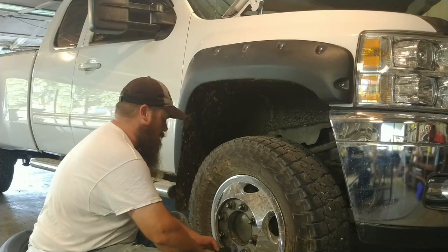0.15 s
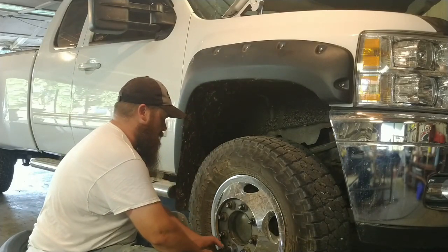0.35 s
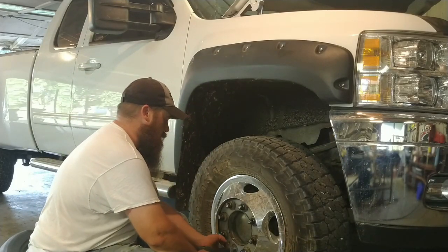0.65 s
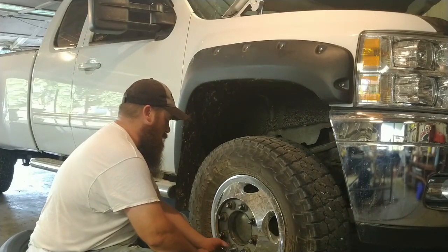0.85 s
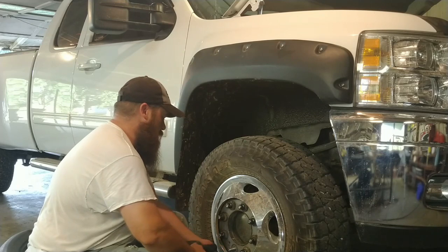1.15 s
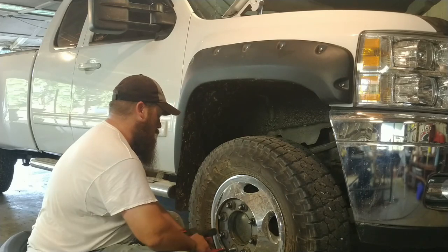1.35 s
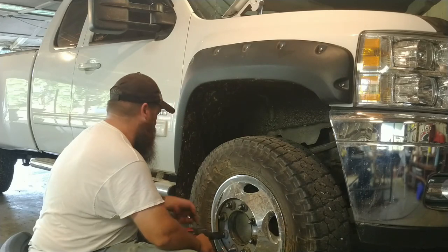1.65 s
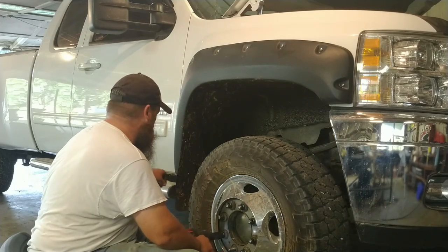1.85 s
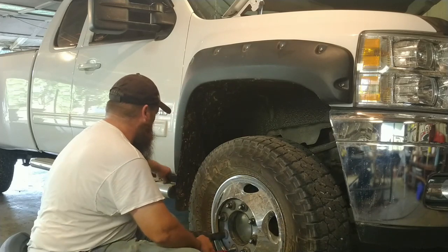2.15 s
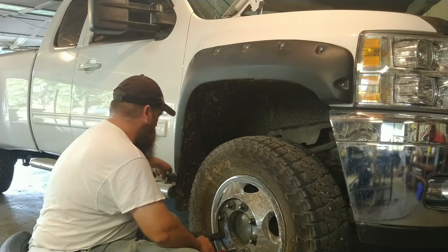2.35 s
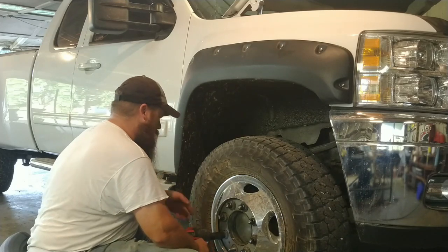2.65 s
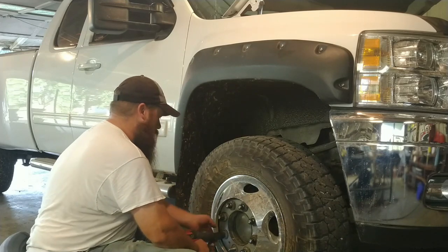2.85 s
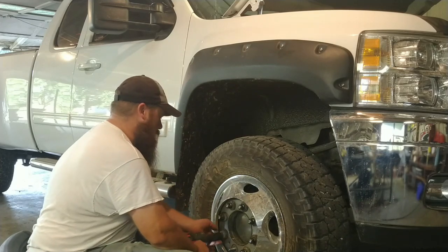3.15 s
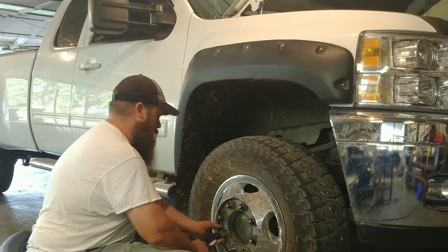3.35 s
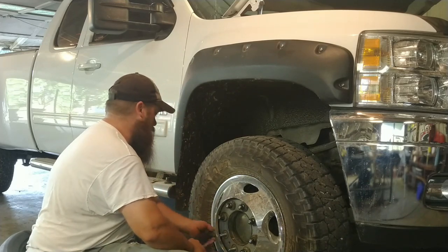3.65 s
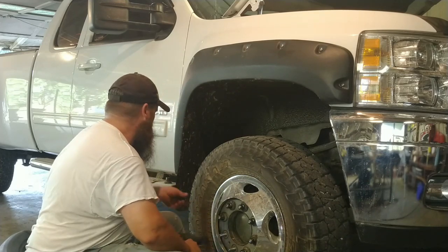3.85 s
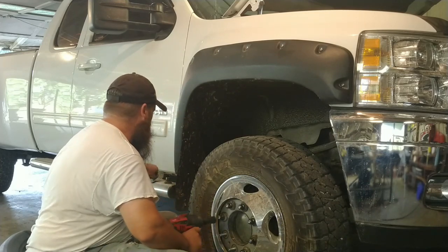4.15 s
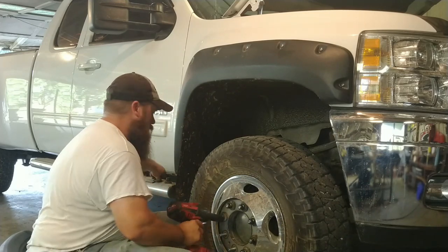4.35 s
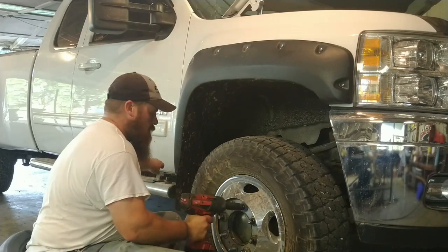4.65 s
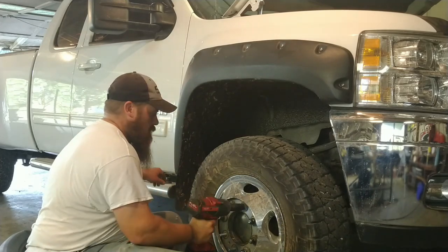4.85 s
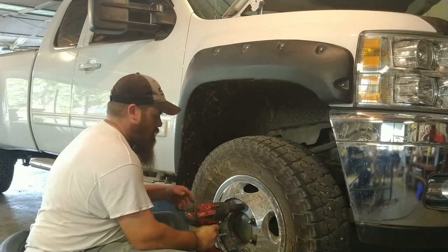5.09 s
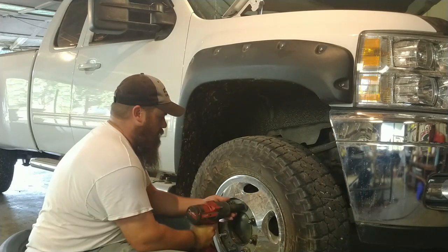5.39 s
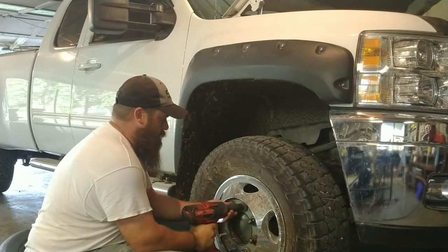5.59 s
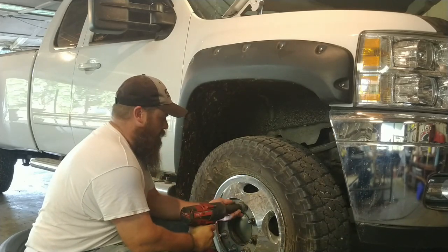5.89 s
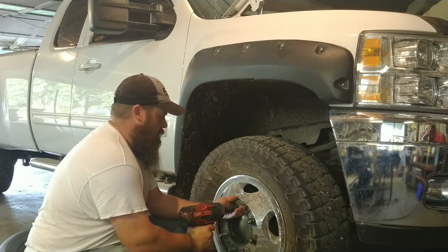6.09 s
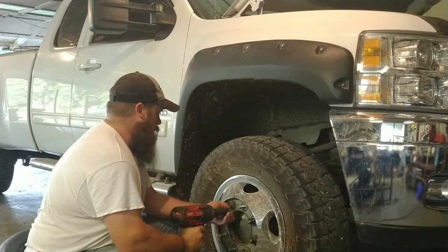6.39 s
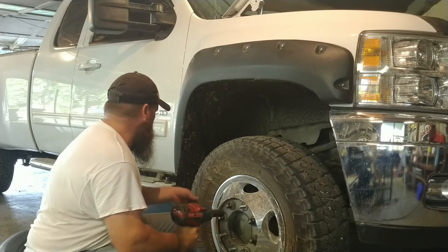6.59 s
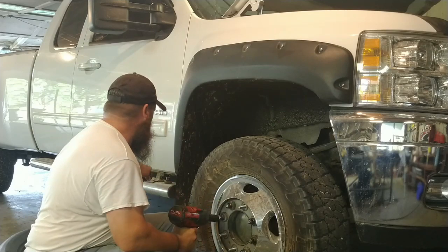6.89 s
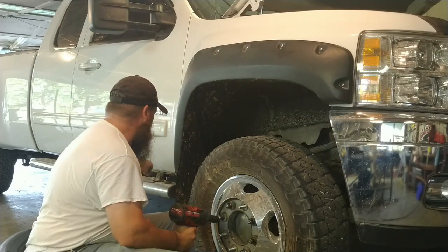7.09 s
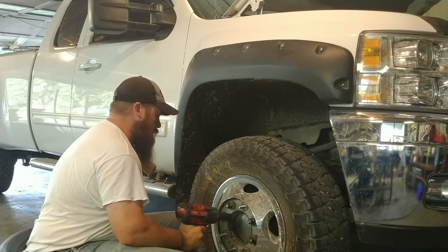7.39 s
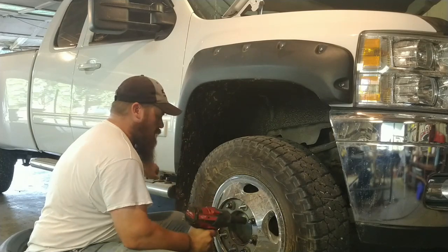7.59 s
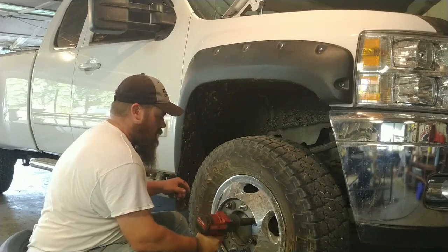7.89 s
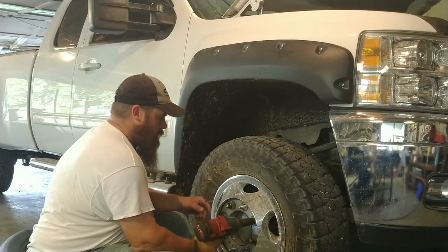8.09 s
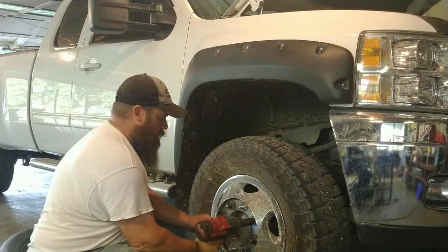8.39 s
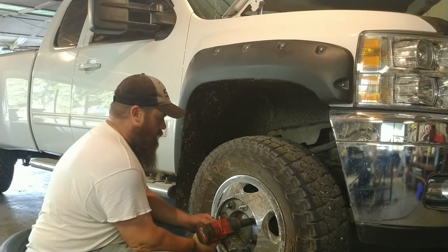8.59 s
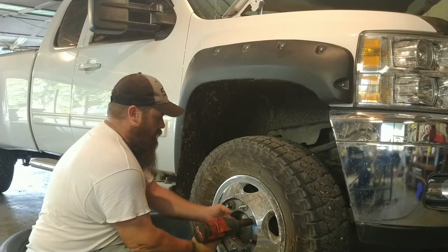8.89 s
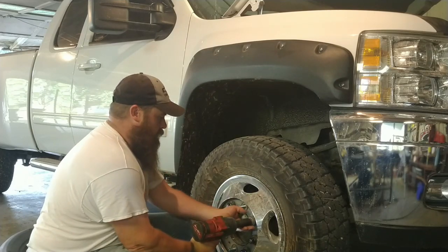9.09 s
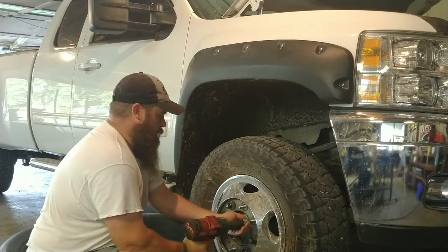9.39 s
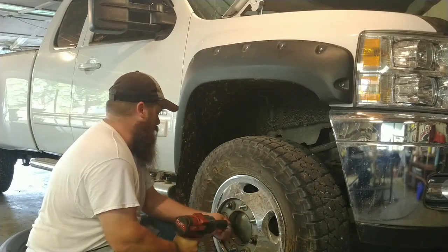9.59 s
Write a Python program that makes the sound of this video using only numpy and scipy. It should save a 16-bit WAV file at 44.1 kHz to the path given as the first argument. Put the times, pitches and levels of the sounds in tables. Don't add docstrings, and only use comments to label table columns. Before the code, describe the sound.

A cordless impact wrench works on a wheel in a hard, echoing workshop, heard close in wide stereo. An already running spin brakes at the very start, followed by short rattling blips and clicks around 0.3, 0.7 and 1.0 seconds. Soft taps follow, then a cluster of heavy socket clanks at 2.1-2.4. At 2.7 the first long pull begins: about thirty blows a second in a harsh growl until 3.0, then a whirring rising whine, braking squeal and stop at 3.8. Clanks sound at 4.6, with bright ringing bounces around 5.0. The second pull runs 5.4-6.4, ending with a small nut rattle. Quiet handling and a knock at 7.4 lead to several sharp clanks at 7.9-8.1. The third pull hammers from 8.6 to 8.9, whines loudly, and brakes near 9.5, ending in a short rattle. Faint shop air and low hum persist underneath.

```python
import sys
import numpy as np
from scipy import signal
from scipy.fft import rfft, irfft
from scipy.io import wavfile
from scipy.ndimage import uniform_filter1d

SR = 44100
rng = np.random.default_rng(int(sys.argv[2]) if len(sys.argv) > 2 else 0)


def inscribe(sig):
    pcm = np.round(np.clip(np.atleast_2d(sig).T, -1, 1) * 32767)
    wavfile.write(sys.argv[1], SR, pcm.astype(np.int16))


def convert_level_to_amplitude(level_db):
    exponent = np.asarray(level_db, float) / 20
    return 10 ** exponent


N = 429534
T = np.arange(N) / SR

# start [t/s], end [t/s], blow rate [f/Hz]
HAMMER_RUNS = [
    (2.749, 3.013, 30.9),
    (5.407, 5.671, 30.1),
    (8.589, 8.889, 32),
]
# onset [t/s], level [level/dB], hardness [0 dull to 2 bright],
# thud [level/dB], steel ring [level/dB]
SOCKET_CLANKS = [(0.301, -25.5, 1.01, -41.5, -41), (0.685, -27, 1.05, -62, -34),
                 (1.07, -27.5, 0.33, -69.5, -57), (2.098, -45, -0.47, -54, -72),
                 (2.136, -16, 0.53, -27.5, -66), (2.344, -24, 0.61, -26, -39.5),
                 (2.365, -17.5, -0.057, -46, -37.5), (4.352, -61.5, 0.55, -90.5, -90),
                 (4.555, -65, 1.04, -45.5, -89.5), (4.577, -25, -0.2, -35, -50),
                 (4.586, -24, 0.29, -46, -29), (7.109, -58.5, 1.55, -75.5, -34.5),
                 (7.14, -61, 1.1, -76, -39), (2.41, -25.5, 0.095, -35, -60),
                 (7.384, -30.5, 0.09, -38.5, -28.5), (7.915, -38.5, -0.22, -50, -75),
                 (7.937, -46, -0.37, -68, -58), (7.963, -31.5, 1.01, -55, -46),
                 (7.995, -28.5, 0.6, -44, -73), (8.103, -30, -0.075, -36, -70)]
NUT_CLANKS = [
    (0.952, -37, 0, -54, -61.5),
    (1.648, -57, 1.24, -65.5, -59.5),
    (1.83, -32, 0.43, -51, -63),
    (3.8, -32.5, 1.28, -79.5, -31.5),
    (4.961, -21.5, 0.59, -79, -30.5),
    (5.03, -25.5, 0.7, -63, -30),
    (5.069, -24.5, 0.52, -39, -42),
    (6.439, -37, 1.205, -55.5, -41.5),
    (6.754, -65, 1.7, -78, -57),
    (6.826, -67.5, 0.53, -63, -77),
]
# start [t/s], trigger release [t/s], stop [t/s],
# top pole pitch [f/Hz], level [level/dB]
MOTOR_SPINS = [
    (-.5, -.04, 0.1, 4575, -47.5),
    (.705, .91, 0.99, 3854, -45.5),
    (3.06, 3.543, 3.793, 4593, -50),
    (5.69, 6.197, 6.43, 4632, -52),
    (8.93, 9.475, 9.57, 4620, -42),
]
BLIP_S = .3


def band(x, lo_hz, hi_hz, order=2):
    sos = signal.butter(order, [lo_hz, min(hi_hz, .45 * SR)], "bandpass", fs=SR, output="sos")
    return signal.sosfilt(sos, x) * np.sqrt(SR / 2 / (hi_hz - lo_hz))


def mode(x, hz, t60):
    radius = np.exp(-np.log(1000) / (t60 * SR))
    angle = 2 * np.pi * hz / SR
    return signal.lfilter([np.sin(angle)], [1, -2 * radius * np.cos(angle), radius * radius], x)


def rough_tone(hz, width_hz):
    sos = signal.butter(2, width_hz / 2, fs=SR, output="sos")
    slow = signal.sosfilt(sos, rng.standard_normal((2, N)))
    turn = 2 * np.pi * np.cumsum(hz) / SR
    return (slow[0] * np.cos(turn) + slow[1] * np.sin(turn)) / slow.std()


def holds(rows, edge_s):
    out = np.zeros(N)
    for row in rows:
        start, end = row[0], row[0] + row[1]
        out[int(start * SR):int(end * SR)] = convert_level_to_amplitude(row[-1])
    return uniform_filter1d(out, int(edge_s * SR))


def play(curves, column, fade_s=0.013):
    rows = np.vstack(curves)
    gate = sum((T >= c[0][0]) & (T < c[-1][0]) for c in curves)
    return np.interp(T, rows[:, 0], rows[:, column]), uniform_filter1d(1. * gate, int(fade_s * SR))


def dull(x):
    return signal.sosfilt(signal.butter(8, 12400, fs=SR, output="sos"), x)


def air():
    # frequency [f/Hz], density [level/dB]
    spectrum = [(30, -13.5), (60, -7.5), (130, 8.5), (250, -4.5), (500, -2), (900, -10), (2000, -15.5),
                (5000, -28), (10000, -30.5), (16000, -23.5)]
    log_hz, db = np.log(np.array(spectrum)[:, 0]), np.array(spectrum)[:, 1]
    hz = np.maximum(np.arange(N // 2 + 1) * SR / N, 1)
    x = irfft(rfft(rng.standard_normal((2, N))) * convert_level_to_amplitude(np.interp(np.log(hz), log_hz, db)), N)
    return convert_level_to_amplitude(-66.5) * x / x.std()


def hum():
    # frequency [f/Hz], level [level/dB]
    partials = [
        (70.4, -80),
        (141, -80),
        (210.5, -81.5),
        (281, -86),
        (491, -86),
    ]
    return sum(convert_level_to_amplitude(db) * np.sin(2 * np.pi * hz * T) for hz, db in partials) * np.array([[1], [-.3]])


def pops():
    # onset [t/s], level [level/dB]
    thumps = [
        (.953, -38),
        (3.806, -46),
        (.04, -42),
    ]
    taps = np.zeros(N)
    for s, db in thumps:
        taps[int(s * SR):int((s + .002) * SR)] = convert_level_to_amplitude(db)
    return band(taps, 25, 540, order=1) * np.array([[1], [.5]]) / 3


def room(x, direct_db, bend):
    changes = [0, .097, .955, 1.6, 2.09, 2.66, 3.8, 4.5, 4.95, 5.35, 6.44, 7.1, 7.37, 7.9, 8.51, 9.59]
    # low edge [f/Hz], high edge [f/Hz], time to fall 60 dB [t/s],
    # share that differs between the ports [ratio]
    decay = [
        (86, 462, 0.47, 0.72),
        (424.4, 1136, 0.27, 0.6),
        (1640, 3950, 0.36, 0.9),
        (5750, 31000, 0.35, 1.07),
    ]
    t = np.arange(int(.6 * SR)) / SR
    edges = [int(s * SR) for s in changes] + [N]
    sides = np.array([[1], [-1]])
    parts = []
    for a, b in zip(edges, edges[1:]):
        noise = rng.standard_normal((2, len(t))) * np.minimum(t / 0.003, 1)
        tail = 0
        for lo_hz, hi_hz, t60, apart in decay:
            x_band = band(noise[0] + apart * noise[1] * sides, lo_hz, hi_hz)
            weight = np.sqrt((hi_hz - lo_hz) / t60 / (1 + apart ** 2))
            tail = tail + x_band * weight * convert_level_to_amplitude(-60 * (t / t60) ** bend)
        tail /= np.sqrt(np.sum(tail ** 2, axis=1, keepdims=True))
        early = rng.standard_normal((2, 900)) * np.exp(-np.arange(900) / 260)
        tail[:, :900] += convert_level_to_amplitude(-3.5) * early / np.sqrt(np.sum(early ** 2, axis=1, keepdims=True))
        tail[:, 0] += convert_level_to_amplitude(direct_db)
        parts.append(signal.fftconvolve(x[None, a:b], tail, axes=1)[:, :b - a])
    return np.hstack(parts)


def flutter(x):
    flutter_hz, share = 70, .6
    hz = np.arange(N // 2 + 1) * SR / N
    loop = share / (1 + (hz / 600) ** 2)
    comb = np.sqrt(1 - loop ** 2) / (1 - loop * np.exp(-2j * np.pi * hz / flutter_hz))
    return irfft(rfft(x) * comb, N)


def knocks():
    # onset [t/s], centre [f/Hz], level [level/dB], rise [t/s]
    soft = [(1.272, 211, -68, 0.031), (1.688, 187, -52, 0.0098), (2.03, 224, -60, 0.035),
            (5.078, 181, -35, 0.019), (6.698, 272, -57, 0.024), (7.39, 327, -38.5, 0.0058),
            (7.39, 683, -39.5, 0.016), (7.07, 498, -62.5, 0.015), (7.2, 291, -58.5, 0.037),
            (7.78, 297, -64.5, 0.023), (7.96, 282, -51.5, 0.031), (8.062, 183, -43, 0.044)]
    out = np.zeros(N)
    for s, hz, db, rise in soft:
        t = np.arange(int(10 * rise * SR)) / SR
        push = rng.standard_normal(len(t)) * t / rise * np.exp(1 - t / rise)
        out[int(s * SR):int(s * SR) + len(t)] += convert_level_to_amplitude(db) * band(push, 0.64 * hz, 1.11 * hz)
    return out


def clanks():
    # low edge [f/Hz], high edge [f/Hz], gain [level/dB], rise [t/s]
    bands = [
        (465, 2300, -1.5, 0.021),
        (124, 585, 5.5, 0.019),
        (1386, 5050, -4, 0.0032),
        (3610, 11300, 6, 0.00036),
    ]
    # frequency [f/Hz], level [level/dB], t60 [t/s]
    wheel = [(750, 19, 0.1184), (1204, -20.5, 0.63), (1351, -19, 0.41), (1651, 8.5, 0.13),
             (1990, -17, 0.044), (2803, 0.5, 0.12), (3317, 4.5, 0.036), (4520, 30.5, 0.95),
             (5060, 16, 0.59), (6300, -1.5, 0.66), (8130, -63.5, 0.096), (8980, -23, 0.38)]
    tick_share, hardness_db = 0.23, 12.5
    drive = np.zeros((4, N + SR))
    t = np.arange(int(.15 * SR)) / SR
    rise = np.array(bands)[:, 3:]
    envelope = tick_share * np.exp(-t / 0.0016) + (1 - np.exp(-t / rise)) * np.exp(-t / 0.024)
    for s, db, hard, thud_db, _ in SOCKET_CLANKS + NUT_CLANKS:
        low_db, mid_db, top_db = db - hardness_db * (np.arange(3) - hard) ** 2
        levels = convert_level_to_amplitude(np.array([low_db, thud_db, mid_db, top_db]))[:, None]
        drive[:, int(s * SR):int(s * SR) + len(t)] += levels * rng.standard_normal(len(t)) * envelope
    out = sum(convert_level_to_amplitude(db) * band(x[:N], lo_hz, hi_hz) for x, (lo_hz, hi_hz, db, _) in zip(drive, bands))
    for hz, db, t60 in wheel:
        source = drive[0 if hz < 1900 else 2 if hz < 4200 else 3, :N]
        out += convert_level_to_amplitude(.3 * db - 44) * mode(source, hz, min(t60, .25))
    return dull(out + knocks())


def ticks():
    # onset [t/s], level [level/dB]
    contacts = [(0.043, -16.5), (0.301, -23), (0.682, -29), (.722, -19.5), (0.744, -15), (1.833, -22.5),
                (2.139, -16), (2.722, -21.5), (2.73, -15.5), (2.739, -14), (2.751, -18), (2.781, -21.5),
                (2.814, -21), (2.888, -21), (2.984, -21), (3.58, -23), (3.69, -18), (3.799, -32.5),
                (4.585, -36), (4.969, -19), (5.031, -26), (5.07, -21.5), (5.407, -19.5), (5.439, -19),
                (5.452, -22), (5.505, -23), (5.565, -21), (6.752, -60), (6.826, -57), (7.918, -30),
                (7.938, -26), (7.963, -20.5), (2.378, -17), (2.957, -20), (0.783, -21), (1.063, -22),
                (7.997, -19), (8.103, -22), (8.588, -22), (8.613, -21.5), (8.652, -22.5), (8.709, -21),
                (8.825, -20.5), (8.843, -20)]
    out = np.zeros(N)
    t = np.arange(int(.03 * SR)) / SR
    envelope = np.exp(-t / 0.0042) * (1 - np.exp(-t / .0015))
    for s, db in contacts:
        out[int(s * SR):int(s * SR) + len(t)] += convert_level_to_amplitude(db - 8.0) * rng.standard_normal(len(t)) * envelope
    out = dull(band(out, 900, 6500, order=1))
    return np.array([out, np.roll(out, 3)])


def rim():
    # onset [t/s], frequency [f/Hz], level [level/dB], t60 [t/s]
    rim_notes = [(1.833, 2663, -47.5, 0.19), (1.832, 1150, -43.5, 0.11), (1.832, 3330, -47, 0.1),
                 (2.098, 2720, -50.5, 0.18), (2.098, 3650, -57.5, 0.06), (2.139, 5020, -29.5, 0.11),
                 (2.139, 838, -33, 0.074), (2, 282, -41, .15), (2.36, 710, -34, 0.062),
                 (2.36, 530, -39.5, .06), (2.375, 1200, -36, 0.072), (2.36, 1304, -32, 0.11),
                 (4.552, 425, -60, 0.078), (4.59, 770, -30.5, 0.11), (4.585, 353, -41.5, 0.12),
                 (4.585, 1323, -34.5, .12), (4.6, 585, -31, 0.11), (4.965, 990, -39.5, 0.066),
                 (4.965, 3300, -41, .18), (4.965, 2720, -40, .15), (5.072, 2400, -35, .35),
                 (5.08, 2760, -39, 0.28), (6.826, 3600, -66, .04), (6.2, 5100, -70, .04),
                 (4.36, 3600, -67, .06), (1.65, 2900, -63, 0.053), (1.65, 3400, -63, .06),
                 (5.035, 2680, -39, .15), (5.07, 3290, -43, .25), (7.919, 2690, -37, 0.037),
                 (7.919, 1630, -39, 0.055), (7.938, 2660, -33.5, .04), (7.937, 1400, -40, 0.059),
                 (7.962, 2710, -37.5, .08), (7.962, 1410, -39, .06), (7.996, 2727, -36.5, 0.092),
                 (7.995, 1800, -36, 0.078), (8.103, 1083, -32, 0.032), (8.103, 550, -38, 0.079),
                 (8.103, 278.6, -40, 0.24), (7.969, 294, -46.5, 0.22), (7.386, 320, -34.5, 0.24),
                 (5.075, 281, -41, 0.28), (8.103, 3700, -36, 0.053)]
    push_s = 0.00344
    out = np.zeros(N + SR)
    t = np.arange(int(.4 * SR)) / SR
    for s, hz, db, t60 in rim_notes:
        push = rng.standard_normal(len(t)) * np.exp(-t / push_s) / np.sqrt(push_s * SR / 2)
        pair = mode(push, hz, t60) + mode(push * np.cos(300 * t), 1.07 * hz, 0.55 * t60)
        out[int(s * SR):int(s * SR) + len(t)] += convert_level_to_amplitude(db) * pair
    return out[:N]


def steel():
    # frequency [f/Hz], width when shaken [f/Hz], t60 when struck [t/s]
    ring_modes = [
        (12290, 55, .33),
        (11685, 50, .4),
        (13000, 60, .3),
    ]
    # start [t/s], length [t/s], level [level/dB]
    socket_songs = [
        (0.044, .2, -40.5),
        (0.335, 0.13, -40.5),
        (0.705, 0.383, -39.5),
        (3.171, .5, -43),
        (5.405, 0.22, -46.5),
        (5.824, 0.49, -42),
        (8.6, 0.92, -48),
        (9.55, 0.089, -40),
    ]
    nut_songs = [
        (.3, 0.044, -44.5),
        (0.669, 0.039, -40.5),
        (1.0, 0.095, -43),
        (2.72, 0.32, -61),
        (3.2, 0.25, -51),
        (3.83, 0.133, -47),
        (5.39, .06, -46),
        (6.33, 0.27, -39),
        (8.57, 0.12, -47),
        (9.45, 0.19, -48.5),
    ]
    anvil_songs = [
        (.08, .08, -53),
        (.67, 0.11, -47),
        (3.03, .17, -39),
        (5.68, 0.14, -37),
        (5.85, .28, -42),
        (8.92, 0.222, -39.5),
    ]
    cluster = [(.992, .4), (.997, .5), (1.004, .45), (1.011, .3), (1.022, .2)]
    out = 0
    for rows, (hz, width_hz, _) in zip((socket_songs, nut_songs, anvil_songs), ring_modes):
        noise = band(rng.standard_normal(N), hz - width_hz / 2, hz + width_hz / 2, order=1)
        out = out + convert_level_to_amplitude(2.0) * holds(rows, .03) * noise
    push = np.hanning(int(.007 * SR))
    for clank_rows, (hz, _, t60) in zip((SOCKET_CLANKS, NUT_CLANKS), ring_modes):
        taps = np.zeros(N)
        for s, _, _, _, ring_db in clank_rows:
            taps[int(s * SR)] = convert_level_to_amplitude(ring_db - 1.0)
        carrier = np.cos(2 * np.pi * hz * np.arange(len(push)) / SR)
        taps = signal.lfilter(2 * push / push.sum() * carrier, 1, taps)
        out = out + convert_level_to_amplitude(-4) * mode(taps, hz, t60)
        out = out + sum(convert_level_to_amplitude(-3) * mode(taps, apart * hz, share * t60) for apart, share in cluster)
    return out


def spin():
    jump, jump_s, creep, creep_s = .5, .03, .045, .25
    coast_s, lead_s = .29, .035
    grow_db_s, full_s = 36, .15
    blip_fade_db_s = 30
    hz, db, coast, gate = np.full(N, 3000.), np.zeros(N), np.zeros(N), np.zeros(N)
    for start, release, stop, top_hz, level_db in MOTOR_SPINS:
        on = (T >= start - .1) & (T < stop + .03)
        now = T[on]
        t = np.maximum(now - start, 0)
        blip = release - start < BLIP_S
        lag = jump * np.exp(-t / jump_s) if blip else creep * np.exp(-t / creep_s)
        slowing = np.hypot(np.maximum(now - release + .9 * lead_s, 0), lead_s) - lead_s
        hz[on] = top_hz * (1 - lag) * np.exp(-slowing / coast_s)
        if blip:
            db[on] = level_db - blip_fade_db_s * t
            coast[on] = 0
        else:
            db[on] = level_db - grow_db_s * np.maximum(release - full_s - now, 0)
            coast[on] = np.maximum(now - release, 0)
        gate[(T >= start) & (T < stop)] = 1
    gate = uniform_filter1d(gate, int(.01 * SR))

    def part(part_db, fall_db_s):
        return gate * convert_level_to_amplitude(db + part_db + fall_db_s * coast)

    return uniform_filter1d(hz, int(.02 * SR)), coast, part


def load(column):
    # mesh pitch [ratio to pole pitch], mesh [level/dB], gain of the case [level/dB],
    # tooth cry [level/dB], slope per overtone [level/dB]
    loads = [
        (.3, -6, 15, -0.2, -5),
        (.31, 0.5, 3.5, 0, -14),
        (.305, 2.5, 21, -5, 3),
        (.31, 3, 19, 3, 1.5),
        (.265, -4.5, 11.5, -6, 0.7),
    ]
    spin_at = np.searchsorted(np.array(MOTOR_SPINS)[:, 0] - .1, T) - 1
    return np.array(loads)[np.maximum(spin_at, 0), column]


def gears():
    # start [t/s], length [t/s], pitch [f/Hz], level [level/dB]
    squeals = [(0, 0.044, 2310, -33), (.38, .09, 2850, -38), (.715, 0.035, 2750, -37),
               (1.03, 0.06, 2450, -43.5), (2.688, .035, 2750, -43.5), (2.75, .28, 2720, -46),
               (3.59, .1, 2540, -34.5), (5.376, 0.036, 2750, -41.5), (5.42, 0.055, 2720, -41.5),
               (6.25, 0.08, 2465, -37.5), (6.37, 0.046, 2680, -37), (8.54, 0.057, 2750, -43.5),
               (8.6, .13, 2740, -43.5), (9.52, 0.041, 2480, -41.5), (9.63, 0.053, 2584, -35)]
    bite_db, bite_s, bite_hold_s = 28, .003, .075
    steady = .75
    hz, coast, part = spin()
    mesh = part(7.8, -19) * convert_level_to_amplitude(load(column=1)) * rough_tone(load(column=0) * hz, 240)
    squeal_hz = np.interp(T, *np.array(squeals)[:, [0, 2]].T)
    housing = holds(squeals, 0.012) * rough_tone(squeal_hz, 230)
    teeth_hz = .618 * hz
    bite = convert_level_to_amplitude(bite_db * (1 - np.exp(-coast / bite_s)) - 900 * np.maximum(coast - bite_hold_s, 0))
    clean = np.sqrt(2) * np.sin(2 * np.pi * np.cumsum(teeth_hz) / SR)
    cry = steady * clean + (1 - steady) * 2 * rough_tone(teeth_hz, 150)
    return mesh + housing, part(-5, -20.5) * bite * convert_level_to_amplitude(load(column=3)) * cry


def motor():
    # level [level/dB], fall when coasting [dB/s]
    multiples = [
        (0.7, -125),
        (-2.5, -70),
        (-7.5, -170),
    ]
    # onset [t/s], level [level/dB]
    starts = [
        (.23, -41.5),
        (.655, -60),
        (2.665, -36.5),
        (5.358, -41.5),
        (8.521, -37.5),
    ]
    case_hz, case_width_hz = 3150, 520
    flicker_db, flicker_s = 3.5, .02
    hz, _, part = spin()
    wobble = 1 + .008 * uniform_filter1d(rng.standard_normal(N), 400)
    turn = 2 * np.pi * np.cumsum(hz * wobble) / SR
    out = np.zeros(N)
    for k, (db, fall_db_s) in enumerate(multiples):
        if k == 0:
            gain_db = load(column=2) * np.exp(-((hz - case_hz) / case_width_hz) ** 2)
        else:
            gain_db = k * load(column=4)
        out += part(db, fall_db_s) * np.sin((k + 1) * turn) * convert_level_to_amplitude(gain_db)
    k = int(flicker_s * SR)
    flicker = uniform_filter1d(np.repeat(rng.standard_normal(N // k + 1), k)[:N], k)
    out = out * convert_level_to_amplitude(flicker_db * flicker)
    t = np.arange(int(.07 * SR)) / SR
    whistle = np.sin(2 * np.pi * (9950 * t + 3000 * t ** 2)) * np.sin(np.pi * t / t[-1]) ** 1.2
    whistle *= 1 + 0.53 * np.cos(2 * np.pi * t / .035)
    for s, db in starts:
        out[int(s * SR):int(s * SR) + len(t)] += convert_level_to_amplitude(db - 4.5) * whistle
    return out


def rattle(scatter_db, hold_s):
    k = int(hold_s * SR)
    stray = np.clip(rng.standard_normal(N // k + 1), -1.5, 1.5)
    jumps = convert_level_to_amplitude(scatter_db * np.repeat(stray, k)[:N])
    x = rng.standard_normal(N) * uniform_filter1d(jumps, k)
    return x / x.std()


def blows():
    hits, tight = np.zeros(N), np.zeros(N)
    for start, end, rate_hz in HAMMER_RUNS:
        chance = rng.standard_normal((24, 2))
        s = start + np.cumsum(1 + 0.05 * chance[:, 0]) / rate_hz - 1 / rate_hz
        hits[(s[s < end] * SR).astype(int)] = convert_level_to_amplitude(1.5 * chance[s < end, 1])
        tight[int(start * SR):int(end * SR)] = 1

    def beat(tau_s, depth):
        decays = signal.lfilter([1], [1, -np.exp(-1 / (tau_s * SR))], hits)
        return 1 + tight * depth * (decays / (31 * tau_s) - 1)

    return beat


def wrench():
    # time [t/s], shake [level/dB], weight leaning on the wheel [level/dB]
    pulls = [
        [(2.67, -81, -2), (2.692, -40.5, -29), (2.728, -31.5, -3.5), (2.978, -32, -4), (3.142, -45.5, -11),
         (3.182, -34.5, 0.5), (3.544, -34.5, -1), (3.67, -29, -2), (3.8, -44, 2.5)],
        [(5.35, -79, 0), (5.382, -41, -36), (5.416, -31, -3.5), (5.646, -33.5, -4.5), (5.762, -42, -3.5),
         (6.056, -38.5, 1.5), (6.232, -29.5, -4), (6.42, -35, 3), (6.44, -50, -13)],
        [(8.52, -91, 5), (8.542, -52, -23), (8.59, -31, -4.5), (8.892, -33.5, -3), (9.032, -43.5, 0),
         (9.168, -31.5, -1.5), (9.428, -35, -6), (9.556, -31.5, -4), (9.59, -42, -4)],
    ]
    blips = [
        [(0.0, -27.5, 2.5), (0.04, -32.5, -2.5), (0.122, -41.5, 4), (0.3, -38.5, -13.5)],
        [(0.3, -36, 1.5), (0.448, -33, 5.5), (0.638, -60, -12), (0.66, -40.5, -46)],
        [(0.66, -45.5, -22), (0.735, -29, -2), (0.812, -37, 0), (0.97, -40.5, -2)],
        [(0.97, -47, 1.5), (0.976, -44.5, 1), (1.064, -31.5, 1), (1.2, -58, -18.5)],
        [(3.8, -56, 3), (3.806, -47, 6.5), (3.894, -42, -8), (3.98, -96, -21)],
        [(6.44, -43.5, 1.5), (6.5, -52.5, -5), (6.56, -42.5, -13), (6.62, -83, -18.5)],
        [(9.59, -39.5, 11.5), (9.618, -28.5, 1.5), (9.662, -32, 3.5), (9.74, -46, 5.5)],
    ]
    loosen_s = 0.26
    beat = blows()
    growl = band(rattle(6.8, .004) * beat(0.0065, 0.44), 880, 1900)
    growl += convert_level_to_amplitude(-16.5) * band(rattle(2.6, 0.011), 240, 480)
    squeal = band(rattle(3.1, .003) * beat(0.0059, 0.27), 1490, 4910)
    squeal += convert_level_to_amplitude(-10) * band(rattle(5, .006), 2380, 2900)
    hiss = band(rattle(5, .002) * beat(0.0044, 0.39), 4300, 12000, order=1)
    rumble = band(rattle(4.3, .008) * beat(0.0079, 0.83), 44, 600)
    curves = sorted(pulls + blips)
    shake_db, gate = play(curves, column=1)
    weight_db, _ = play(curves, column=2)
    tight = sum((T >= a) * np.exp(-np.maximum(T - b, 0) / loosen_s) for a, b, _ in HAMMER_RUNS)
    coasting = np.minimum(spin()[1] / .05, 1)

    def shaken(x, rest_db, hammer_db, coast_db, weight_share):
        change_db = hammer_db * tight + coast_db * coasting + weight_share * weight_db
        return x * convert_level_to_amplitude(shake_db + rest_db + change_db)

    return gate * (shaken(growl, -6.5, 2.5, 1.5, 1) + shaken(squeal, -5, 2.5, 2.5, -0.05)
                   + shaken(hiss, -8.5, 3.5, -3.5, -0.24) + shaken(rumble, -23.5, 19, -18, 1))


def scene():
    rings, tones, notes = steel(), motor(), rim()
    mesh, cry = gears()
    far = wrench() + clanks() + notes + convert_level_to_amplitude(-7) * rings + convert_level_to_amplitude(-3) * tones + convert_level_to_amplitude(2) * mesh + convert_level_to_amplitude(-4.5) * cry
    near = rings * convert_level_to_amplitude(np.array([[-14], [-5]])) + convert_level_to_amplitude(0.3) * cry
    near = near + convert_level_to_amplitude(4) * np.array([tones, np.roll(tones, 1)])
    near = near + convert_level_to_amplitude(-5) * np.array([mesh, np.roll(mesh, 3)])
    near = near + convert_level_to_amplitude(-6) * np.array([notes, np.roll(notes, 3)])
    return flutter(room(far, direct_db=-8.5, bend=1.293) + air()) + near + hum() + pops() + ticks()


def band_limit(x):
    return signal.sosfilt(signal.butter(12, 15500, fs=SR, output="sos"), x)


def record(dry):
    lag, share = 20, 0.64
    for order, hz in ((2, 14800), (16, 15100)):
        dry = signal.sosfilt(signal.butter(order, hz, fs=SR, output="sos"), dry)
    port = signal.butter(1, [2395, 2670], "bandpass", fs=SR, output="sos")
    dry = dry + convert_level_to_amplitude(-7) * signal.sosfilt(port, dry)
    other = np.pad(dry[::-1], ((0, 0), (lag, 0)))[:, :N]
    late = signal.lfilter(*signal.butter(1, 12100, fs=SR), other)
    self_noise = convert_level_to_amplitude(-86.5) * band(rng.standard_normal((2, N)), 1500, 14500, order=4)
    wide = 0.77 * (dry - share * late) + self_noise
    left = signal.sosfilt(signal.butter(2, 12500, fs=SR, output="sos"), wide[0])
    wide = np.array([left, wide[1]])
    return band_limit(.3 * np.tanh(wide / .3))


dry = scene()
out = record(dry)
inscribe(out)
```